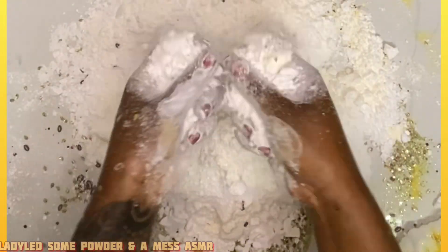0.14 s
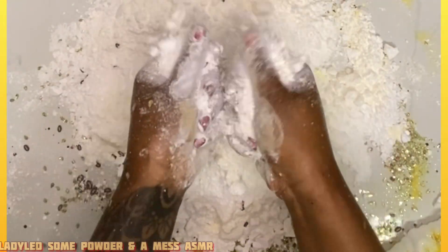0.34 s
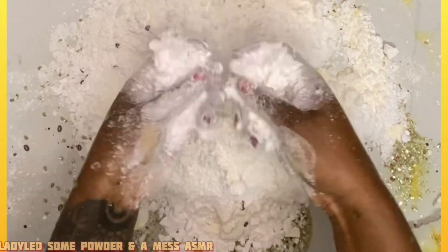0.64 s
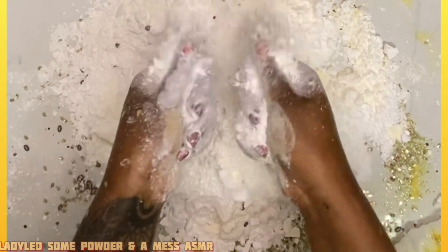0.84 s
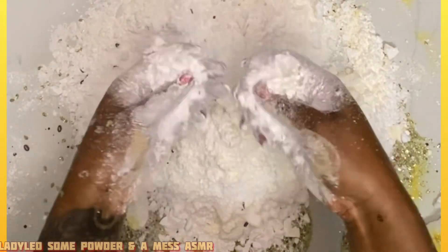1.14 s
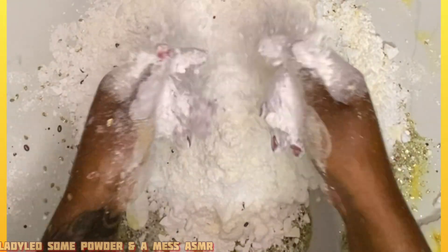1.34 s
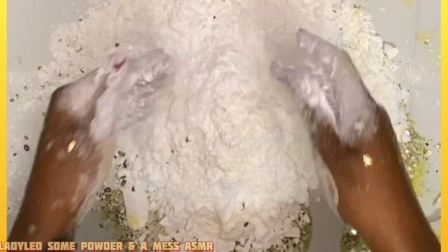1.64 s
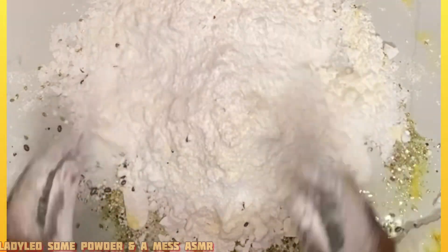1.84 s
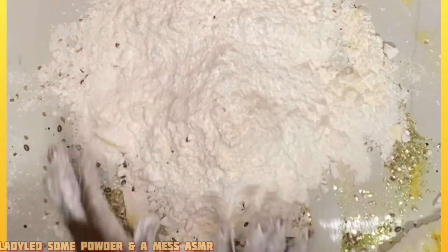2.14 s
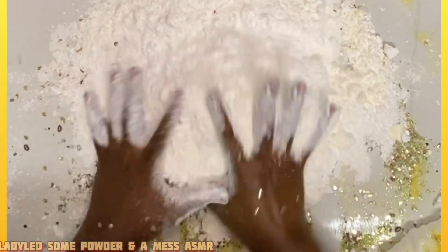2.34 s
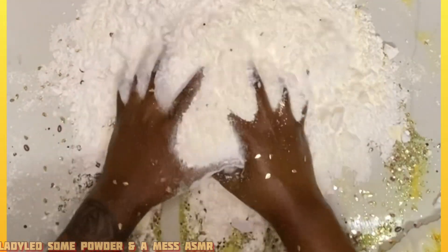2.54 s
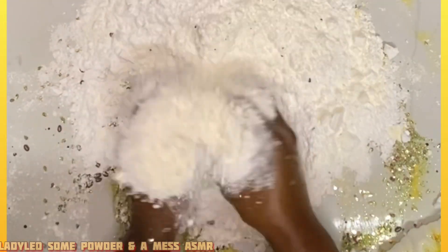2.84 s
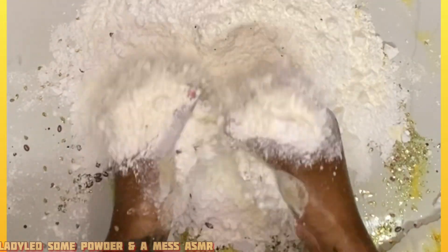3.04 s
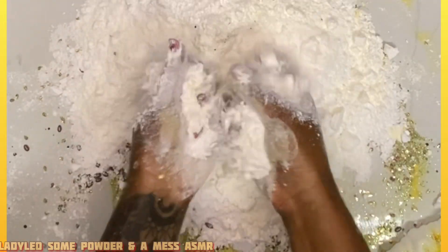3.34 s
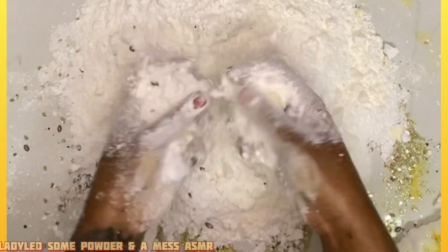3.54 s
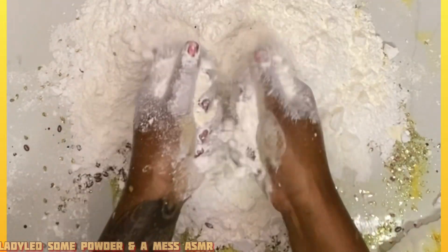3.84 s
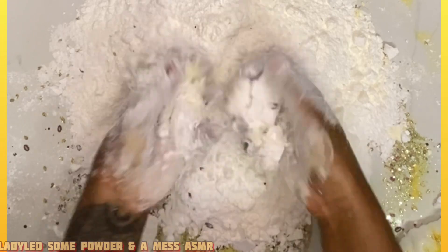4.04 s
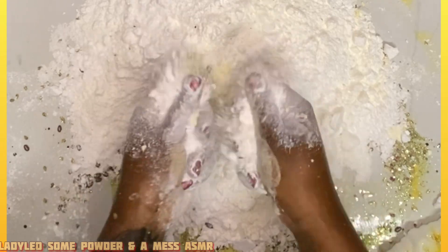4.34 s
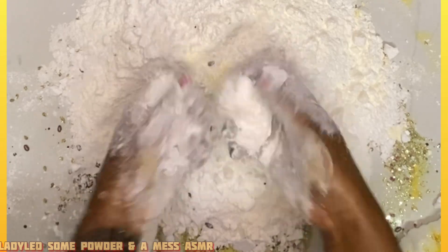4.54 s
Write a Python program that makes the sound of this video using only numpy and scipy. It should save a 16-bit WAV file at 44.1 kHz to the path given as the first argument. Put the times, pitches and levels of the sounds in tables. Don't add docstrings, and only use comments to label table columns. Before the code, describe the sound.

In a quiet indoor space, two hands work a mound of starchy powder and chalk crumbs, heard very close in wide stereo. A deep hum around 50 to 60 Hz wavers and swells throughout, with faint microphone hiss. Soft creaks and powder hiss begin at once; a bright dry crack with a crunch lands at 0.4 s, and duller breaks cluster around 0.8 to 0.9 s. From 1.0 to 1.7 s come lighter crackles and small finger snaps. Things thin out around 1.8 to 2.1 s, leaving sliding dust. At 2.2 to 2.35 s the palms skid, a short thin squeak with a strong hiss. The fullest crunch, dense and crackly, comes at 2.65 to 2.8 s, then deep creaking, a sharp crack at 3.16 s, and more breaks until 3.8 s. Softer rubbing, powder swishes and sparse snaps continue to about 4.7 s.

```python
import sys
import numpy as np
from scipy import signal
from scipy.fft import rfft, irfft
from scipy.io import wavfile

SR = 44100
rng = np.random.default_rng(int(sys.argv[2]) if len(sys.argv) > 2 else 0)


def boost_factor(decibels):
    exponent = np.asarray(decibels, float) / 20
    return 10 ** exponent


def log_audio(samples):
    frames = np.atleast_2d(samples).T
    limited = np.clip(frames, -1, 1)
    pcm = np.round(limited * 32767).astype(np.int16)
    wavfile.write(sys.argv[1], SR, pcm)


N = 207666


def rms_one(x):
    return x / np.sqrt(np.mean(x ** 2) + 1e-20)


def over_time(start_s, values):
    return np.interp(np.arange(N) / SR, start_s, values)


def at_hz(points, hz):
    hz_points, values = np.transpose(points)
    return np.interp(np.log(hz + 1), np.log(hz_points + 1), values)


def coloured(x, spectrum):
    gain = boost_factor(at_hz(spectrum, np.fft.rfftfreq(N, 1 / SR)))
    return rms_one(irfft(rfft(x) * gain, N))


def band(x, low_hz, high_hz):
    return signal.sosfilt(signal.butter(2, [low_hz, high_hz], "band", fs=SR, output="sos"), x)


def resonance(x, hz, width_hz):
    r = np.exp(-np.pi * width_hz / SR)
    feedback = [1, -2 * r * np.cos(2 * np.pi * hz / SR), r * r]
    return signal.lfilter([(1 - r * r) / 2, 0, (r * r - 1) / 2], feedback, x)


def drift(rate_hz):
    r = np.exp(-2 * np.pi * rate_hz / SR)
    wander = signal.lfilter([1], [1, -2 * r, r * r], rng.standard_normal(N + SR))
    return rms_one(wander[SR:])


def swells(start_s, peak_db, rise_s, fall_s, rounded):
    hop = 64
    since_s = np.arange(0, N + hop, hop) / SR - start_s[:, None]
    rise_s = np.clip(rise_s, .005, 1)[:, None]
    fall_s = np.clip(fall_s, .005, 1)[:, None]
    away = np.where(since_s < 0, -since_s / rise_s, since_s / fall_s)
    level_db = peak_db[:, None] - np.minimum(10 * away ** rounded, 200)
    power = np.sum(boost_factor(level_db) ** 2, axis=0)
    return np.interp(np.arange(N) / hop, np.arange(len(power)), np.sqrt(power))


def grains(per_s, spread_db, clumps_db):
    sizes = boost_factor(spread_db * np.minimum(rng.exponential(1, N), 4)) * rng.choice([-1, 1], N)
    slips = rng.random(N) < per_s * boost_factor(clumps_db) / SR
    return sizes * slips + 1e-18


def crumb_rings(slips, low_hz, high_hz, cycles, tilt):
    pitches_hz = np.geomspace(low_hz, high_hz, 14)
    crumb = rng.integers(0, 14, N)
    out = np.zeros(N)
    for k, hz in enumerate(pitches_hz):
        out += resonance(slips * (crumb == k) + 1e-18, hz, hz / cycles) / hz ** tilt
    return rms_one(out)


# hz, level_db
DUST_SPECTRUM = [(2300, -6), (3300, -11), (4400, -5), (5600, -3.5), (6500, -3.5), (7300, -6.5),
                 (8000, -4.5), (9300, -3.5), (10400, -13.5)]
# start_s (moment of the peak), crackle_db, fall_s (per 10 dB), depth_db (lumps over
SQUEEZES = [(0.019, -61.5, 0.04, -1), (0.16, -62, 0.1, -5.5), (0.26, -61.5, 0.3, 5), (0.4, -51.5, .09, 1),
            (0.71, -60.5, 0.14, 0.5), (0.83, -55, 0.0572, 6.5), (0.88, -56.5, .12, 2.5),
            (1.205, -60, .11, -6.5), (1.33, -62, .12, -0.5), (1.471, -55.5, 0.01, -7),
            (1.57, -62, 0.02, -2), (1.63, -62.5, .04, -6), (1.92, -69, .1, -1), (2.36, -62.5, 0.19, 8.5),
            (2.495, -56, .12, 9), (2.68, -49.5, 0.1062, 1.5), (2.744, -46.5, .07, 6),
            (2.84, -62, .045, 14.5), (3.03, -62.5, .14, 6.5), (3.161, -51, 0.05, 2.5),
            (3.28, -56.5, 0.1, -1), (3.382, -54, -0.0171, 1.5), (3.47, -61.5, 0, -11),
            (3.645, -62, 0.1, -13), (3.71, -59.5, 0.08, 2), (3.82, -63.5, 0.27, -0.5),
            (4.06, -60, 0.03, -11), (4.225, -58, 0.02, -3), (4.38, -67.5, 0.23, 5.5),
            (4.68, -60.5, 0.06, 1)]
# start_s (moment of the peak), hiss_db, rise_s, fall_s (per 10 dB)
SLIDES = [(0.02, -68, 3, .06), (0.12, -65, -0.1, 0.16), (0.37, -63, .2, 0.12), (0.48, -62, 0.07, -0.1),
          (0.59, -64, 0.1, .05), (0.665, -62.5, 0.04, 0.12), (0.87, -61, 0.05, 0.08), (1.0, -68.5, 0.3, 0),
          (1.15, -69.5, .05, 0.43), (1.25, -64.5, 0.05, 0.2), (1.49, -70, .04, 0.2),
          (1.61, -65.5, 0.1, .04), (1.75, -67, .12, 0.2), (1.92, -64, 0.13, 0.2), (2.13, -69, 0.2, .1),
          (2.271, -55.5, 0.12, 0.14), (2.445, -59.5, .05, 0.05), (2.58, -69.5, 0.3, -0.4),
          (2.675, -57.5, 0.1, .06), (2.75, -58.5, .02, 0.03), (3.01, -66, -0.2, 0.14),
          (3.21, -62.5, -1, .09), (3.5, -69, .05, .1), (3.65, -67.5, -0.1, .15), (3.82, -66.5, -0.07, 0.2),
          (4.01, -66, -0.06, 0.15), (4.225, -62, 0, 0.08), (4.39, -60, 0, .12), (4.57, -69.5, .05, 0.8),
          (4.68, -63, -0.04, -2)]


def powder():
    giving = drift(30)
    lumps = grains(5000, spread_db=3.0, clumps_db=1.1 * giving)
    lumps = crumb_rings(lumps, 192, 955, cycles=1.33, tilt=0.9)
    lumps = band(lumps, 170, 560) + .7 * band(lumps, 740, 1200)

    crumbs = grains(2200, spread_db=3.0, clumps_db=2.4 * giving)
    crumbs = band(crumb_rings(crumbs, 826, 3120, cycles=1.8, tilt=0.21), 720, 3430)
    crumbs = crumbs + .6 * resonance(crumbs, hz=900, width_hz=300)

    dust = coloured(grains(15000, spread_db=1.0, clumps_db=1.6 * giving), DUST_SPECTRUM)
    packed_dust = band(dust[::-1], 2400, 8500)

    start_s, crackle_db, fall_s, depth_db = np.transpose(SQUEEZES)
    rise_s = 0.43 * fall_s
    squeeze = swells(start_s, crackle_db, rise_s, fall_s, rounded=1.005)
    deep = swells(start_s, crackle_db + depth_db, rise_s, fall_s, rounded=1.005)
    slide = swells(*np.transpose(SLIDES), rounded=1.48)
    dragged = boost_factor(-8) * slide

    lumps_level = np.hypot(deep, boost_factor(-75))
    crumbs_level = np.hypot(np.hypot(squeeze, dragged), boost_factor(-82))
    dust_level = np.hypot(slide, boost_factor(-82))
    out = boost_factor(5.0) * lumps_level * lumps
    out += boost_factor(1.5) * crumbs_level * crumbs
    out += boost_factor(4.0) * dust_level * dust
    out += boost_factor(5.0) * boost_factor(-7.5) * squeeze * packed_dust
    return out


# start_s, peak_db, ring_hz, thump_db
BREAKS = [(0.1769, -40, 910, -25), (0.2637, -40, 1250, -25), (0.3676, -41.5, 1830, -2),
          (0.3964, -26.5, 2120, -10), (0.3991, -25.5, 2320, -5), (0.8065, -42.5, 1500, -2),
          (0.8163, -46.5, 888, 9), (0.8312, -38, 1810, -3), (0.8691, -35.5, 1790, -5.5),
          (2.642, -45, 2102, -14), (2.6619, -39.5, 2670, -6), (2.7105, -43, 1060, -11.5),
          (2.735, -33.5, 2380, -12), (2.7435, -36, 1020, 2), (2.9948, -47, 3290, -1),
          (3.098, -46.5, 802, 1), (3.0996, -46.5, 2220, -16), (3.1291, -47, 1000, -1),
          (3.1566, -27, 1970, -2), (3.2031, -40, 1970, -1.5), (3.228, -42, 821, -0.5),
          (3.2443, -42, 1217, 1), (3.3755, -54, 1210, -10), (3.467, -47, 4040, -9),
          (3.6908, -40.5, 853, -12), (3.8056, -37, 1390, -7.5)]
# start_s, peak_db, ring_hz
SNAPS = [(0.308, -47, 912), (0.328, -46.5, 942), (0.4776, -50, 813), (0.5343, -47, 2380),
         (0.66, -53.5, 1530), (0.6782, -52.5, 1860), (0.9745, -42.5, 816), (1.1572, -49, 1710),
         (1.2142, -50, 1580), (1.3172, -43, 1638), (1.3613, -41.5, 1851), (1.391, -50.5, 1670),
         (1.407, -48.5, 1640), (1.4588, -40, 2500), (1.5048, -43, 2640), (1.5542, -44.5, 4230),
         (1.5627, -39.5, 1560), (1.6181, -42.5, 1850), (1.656, -54, 1620), (1.734, -52, 832),
         (2.145, -54, 1008), (2.2478, -42.5, 4910), (3.276, -47, 1184), (3.6295, -50.5, 1186),
         (3.6605, -40.5, 1072), (4.0607, -41.5, 2200), (4.2187, -46.5, 1800), (4.373, -55.5, 2087),
         (4.6676, -49, 1497)]


def cracks():
    size = 2048
    out = np.zeros(N + size)
    t = np.arange(size) / SR
    # edge_db, crumble_s; snaps also get thump_db
    rows = [(*row, -21.5, 0.0027) for row in BREAKS]
    rows += [(*row, -26, -19, 0.0021) for row in SNAPS]
    for start_s, peak_db, ring_hz, thump_db, edge_db, crumble_s in rows:
        burst = np.exp(-t / crumble_s) + 0.098 * np.exp(-t / 0.023)
        splinters = rng.standard_normal(size) * (rng.random(size) < .07) * burst
        splinters[30] += 1.5
        ring = resonance(splinters, ring_hz, 0.46 * ring_hz)
        thump = band(splinters, 313, 756)
        edge = band(splinters, 3500, 10000)
        at = int(start_s * SR)
        for layer, rel_db in [(ring, 0), (thump, thump_db), (edge, edge_db)]:
            out[at:at + size] += boost_factor(peak_db + rel_db + 1.5) * layer / np.abs(layer).max()
    return out[:N]


# start_s, level_db
SKID = [
    (2.14, -86),
    (2.2, -65),
    (2.25, -46),
    (2.29, -47),
    (2.32, -55.5),
    (2.38, -87.5),
]
# pitch_hz, width_hz, level_db
SQUEAKS = [(3930, 300, -6), (4625, 30, -7), (4885, 45, 0), (5150, 30, -8), (5630, 180, -1), (6660, 40, -12),
           (5000, 3500, -3)]


def skid():
    noise = rng.standard_normal(N)
    squeaks = np.zeros(N)
    for pitch_hz, width_hz, level_db in SQUEAKS:
        squeaks += boost_factor(level_db) * rms_one(resonance(noise, pitch_hz, width_hz))
    return boost_factor(over_time(*np.transpose(SKID))) * rms_one(squeaks)


# hz, level_db
RUMBLE = [(12, -38), (20, -20), (33, -6), (56, -0.5), (86, -16), (125, -11.5), (219, -33.5), (248, -41.5),
          (311, -38.5), (400, -59.5), (520, -87.5), (880, -120)]
# start_s, level_db
RUMBLE_SWELL = [(0.0, -57.5), (0.6, -53), (1.08, -56), (1.45, -51), (1.68, -60.5), (1.81, -52.5),
                (2.03, -58), (2.4, -53), (2.81, -51), (3.03, -60), (3.16, -51), (3.64, -59), (4.13, -56),
                (4.43, -55), (4.6, -60), (4.71, -49.5)]
# start_s (moment of the peak), peak_db, swell_s (per 10 dB, rise and fall),
# pitch_hz
SURGES = [(0.08, -39.5, .08, 58.36), (0.27, -48.5, 0, 59.2), (0.47, -37.5, 0.05, 62.3),
          (0.63, -50.5, -0.3, 59.1), (0.8, -37, 0.02, 56.1), (0.98, -49.5, -0.2, 51.07),
          (1.14, -38, .035, 45.27), (1.33, -44, 0.16, 41.92), (1.5, -36.5, 0.05, 52), (1.68, -43, .15, 51),
          (1.85, -42.5, 0.1, 51.42), (2.18, -40.5, 0.22, 49.36), (2.44, -45, .1, 56.44),
          (2.55, -38.5, 0.06, 53), (2.91, -40, 0, 52), (3.05, -45, .12, 56.1), (3.23, -44, 0.03, 50.1),
          (3.39, -42.5, .15, 55.6), (3.64, -40.5, .045, 57.46), (3.97, -42.5, 0.05, 55.97),
          (4.22, -47, 0.03, 58), (4.34, -42, 0.1, 58.6), (4.7, -48, .04, 64.1)]


def hum():
    start_s, peak_db, swell_s, pitch_hz = np.transpose(SURGES)
    phase = 2 * np.pi * np.cumsum(over_time(start_s, pitch_hz)) / SR
    tone = np.sqrt(2) * swells(start_s, peak_db, swell_s, swell_s, rounded=1.15) * np.sin(phase)
    rumble = coloured(rng.standard_normal(N), RUMBLE)
    rumble = rumble - 0.94 * band(rumble, 38, 70)
    rumble = band(band(rumble, 34, 740), 24, 900)
    return tone + boost_factor(over_time(*np.transpose(RUMBLE_SWELL)) + 10) * rumble


# hz, left_lead_rad
PORT_PHASE = [(0, 0), (520, 0), (650, 3.0), (880, 2.3), (1000, 1.4), (1250, 0.7), (1810, 0.1), (2670, 1.6),
              (3530, 1.0), (4390, 1.5), (5510, 0.6), (6550, 2.5), (8700, 4.1), (10300, 6.3)]
# hz, left_minus_right_db
PORT_BALANCE = [(60, 0.7), (150, -4), (330, -4), (600, -0.5), (1100, 2), (2500, -3), (5000, -1.3),
                (10000, 0)]
# hz, share_0_to_1
DIRECT = [(40, .997), (130, .88), (350, .5), (540, .02), (780, .2), (1200, .12), (1550, .5), (3000, .52),
          (10000, .5)]


def ports(x, spread):
    hop, size, delay = 384, 2048, 128
    starts = np.arange(0, N + hop, hop)
    pieces = np.pad(x, (hop, 3 * hop))[starts[:, None] + np.arange(2 * hop)]
    pieces = pieces * np.hanning(2 * hop + 1)[:-1]
    hz = np.fft.rfftfreq(size, 1 / SR)

    echoes = rng.standard_normal((2, len(starts), 1000)) * np.exp(-np.arange(1000) / SR / .003)
    scatter = rfft(echoes / np.sqrt(np.sum(echoes ** 2, axis=-1, keepdims=True)), size)
    direct = np.clip(at_hz(DIRECT, hz), 0, 1) ** spread
    side = np.array([.5, -.5])[:, None, None]
    late = np.exp(-2j * np.pi * hz * delay / SR)
    lead = np.exp(1j * side * at_hz(PORT_PHASE, hz)) * late
    paths = np.sqrt(direct) * lead + np.sqrt(1 - direct) * scatter * late
    paths = paths / np.abs(paths) ** .6
    balance = boost_factor(side * at_hz(PORT_BALANCE, hz))
    heard = irfft(rfft(pieces, size) * paths * balance, size)

    out = np.zeros((2, N + 2 * hop + size))
    for k, at in enumerate(starts):
        out[:, at:at + size] += heard[:, k]
    return out[:, hop + delay:hop + delay + N]


# hz, level_db
HISS = [(300, -7), (1000, -2.5), (3000, -0.5), (7300, -1), (10000, -2.5)]


def self_noise():
    hiss = [coloured(band(rng.standard_normal(N), 200, 10500), HISS) for _ in range(2)]
    return boost_factor(-80) * np.array(hiss)


def scene():
    wide = powder() + skid() + hum()
    return ports(wide, spread=1) + ports(cracks(), spread=.45) + self_noise()


def top_cut(x):
    return signal.sosfilt(signal.butter(12, 10750, fs=SR, output="sos"), x)


def record(dry):
    low_pass = signal.ellip(12, .5, 60, 10230, fs=SR, output="sos")
    mix = signal.sosfilt(low_pass, dry)
    return top_cut(mix)


dry = scene()
out = record(dry)
log_audio(out)
```